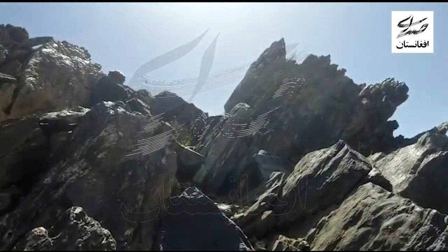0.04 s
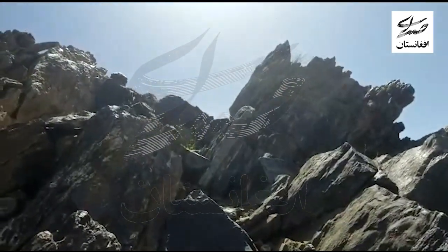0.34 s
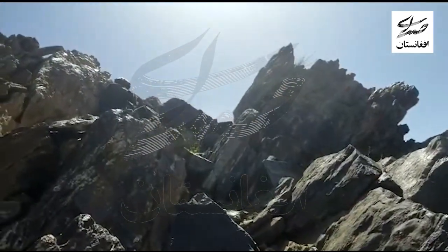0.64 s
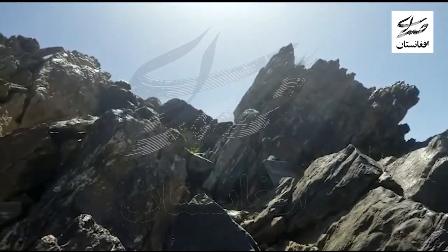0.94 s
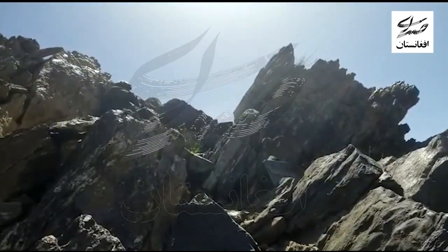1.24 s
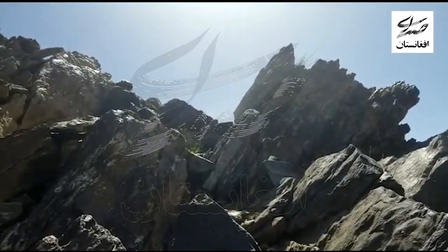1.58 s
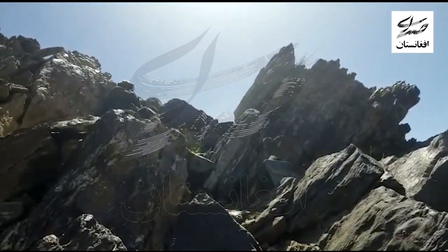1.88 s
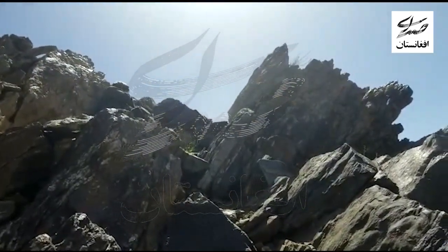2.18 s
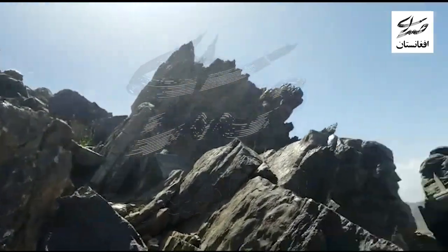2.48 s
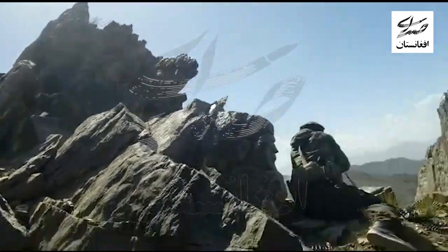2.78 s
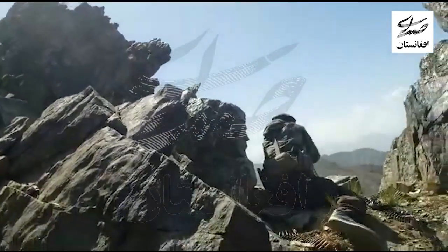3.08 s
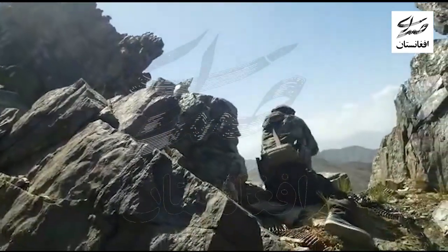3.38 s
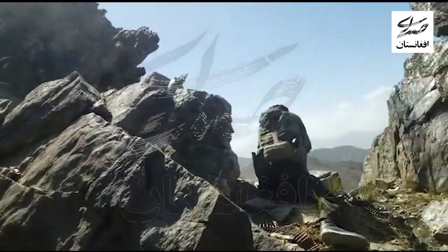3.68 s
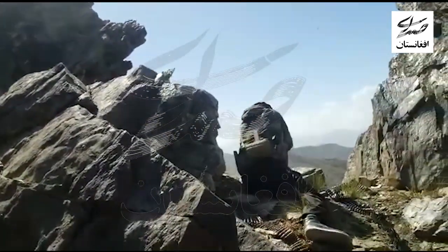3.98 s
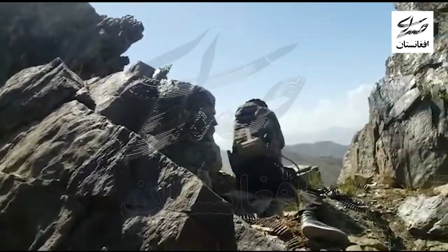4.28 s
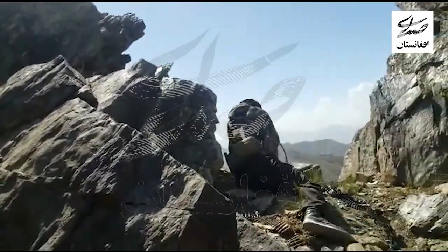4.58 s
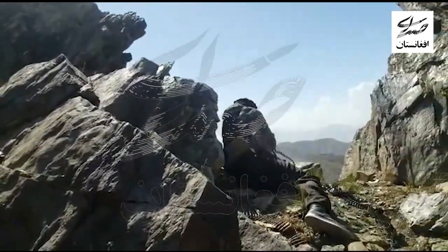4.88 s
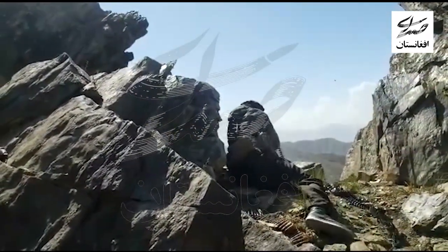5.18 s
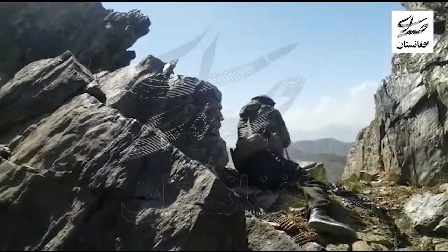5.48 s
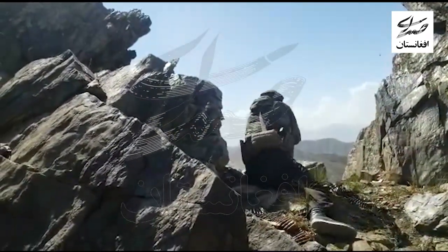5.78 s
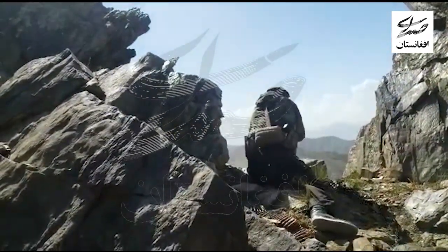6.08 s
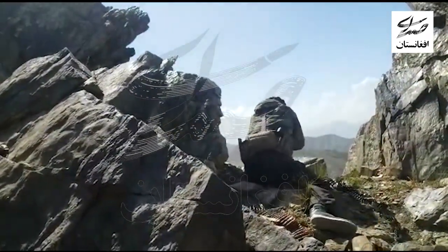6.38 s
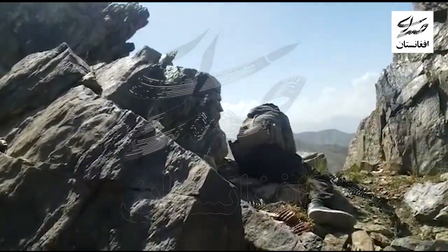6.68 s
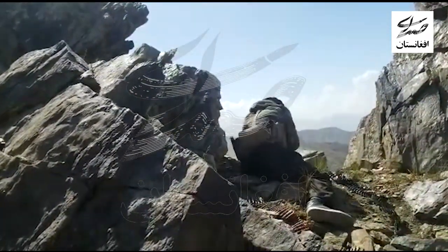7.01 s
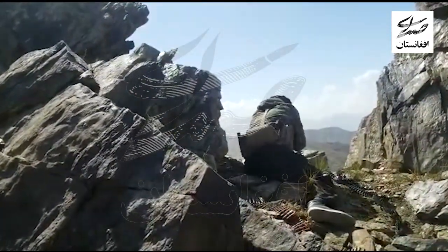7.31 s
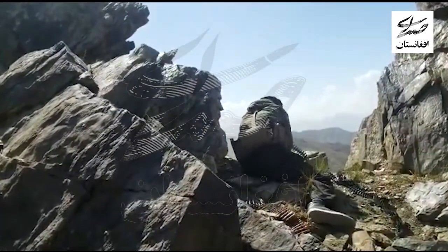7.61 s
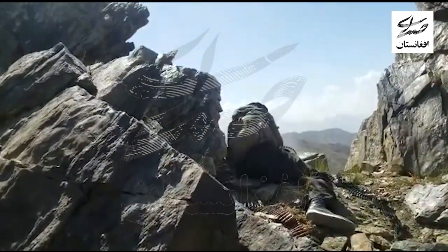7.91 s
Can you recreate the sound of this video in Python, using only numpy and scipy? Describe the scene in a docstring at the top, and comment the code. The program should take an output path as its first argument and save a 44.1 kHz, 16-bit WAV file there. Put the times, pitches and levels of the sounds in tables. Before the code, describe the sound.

Close, loud gunfire outdoors among boulders: a second gun fires once, small metal pieces clink softly, and a machine gun rattles off a brief burst. Two quick single shots follow, then two longer rapid bursts with a few more single shots mixed in. The sharp, thumping reports push the microphone into slight distortion, slap back from the cliffs and fade over the slopes. The gaps are nearly silent.

```python
"""A belt-fed machine gun fires three bursts among boulders on a mountain ridge.
A second gun adds single shots. Each muzzle blast, a pressure jump and its suction, bounces between
the near rocks, scatters off the rubble, slaps back from the cliffs and rolls away down the valley.
The shots overload the microphone; a dull noise bed, a faint rustle and a few clinks lie underneath."""
import sys
import numpy as np
from scipy import signal
from scipy.fft import irfft
from scipy.io import wavfile

SR = 44100
rng = np.random.default_rng(int(sys.argv[2]) if len(sys.argv) > 2 else 0)


def dump(signal):
    """Clip the signal to [-1, 1] and save it as 16-bit WAV at the path in sys.argv[1]."""
    limited = np.clip(np.atleast_2d(signal).T, -1, 1)
    pcm = np.round(limited * 32767).astype(np.int16)
    wavfile.write(sys.argv[1], SR, pcm)


N = 355005
SHORT, LONG = SR // 4, SR  # samples in a hit and in an echo tail


# the machine gun's rounds, in three bursts: t/s, level/dB
ROUNDS = [(1.8406, -0.8), (1.9233, -3), (2.0, -2), (2.082, -3.3), (2.1653, -3), (3.6582, -3.5),
          (3.7387, -1.5), (3.8259, -1.5), (3.913, -1.5), (4.0051, -3.5), (4.0964, -2.2), (4.1861, -2.5),
          (4.2786, -1.5), (4.372, -1), (4.4666, -1.1), (4.5536, -1), (4.6441, -1.5), (4.7468, -0.5),
          (4.8342, -1), (6.6782, 0.2), (6.773, -0.8), (6.8498, -2), (6.9434, -2), (7.037, -0.8),
          (7.1137, -3), (7.1976, -3.5), (7.2854, -2.5), (7.3765, -2.1), (7.464, -3.5), (7.548, -2.5),
          (7.634, -3), (7.7229, -2), (7.8008, -3), (7.8885, -1.8), (7.9682, -3)]
# its straight path to the microphone: delay/s, level/dB, low-pass f/Hz
DIRECT_PATH = (0, -3.6, 3140)
# hollows between the boulders, rung by the blast: f/Hz, t60/s, level/dB, delay/s
HOLLOW_MODES = [(178, .09, -31, .0232), (242, 0.091, -24, .0242), (338.7, .055, -14, .0089),
                (487, 0.089, -20.5, .0001), (685.2, .1, -20.5, .001), (951, .11, -27, .0001),
                (1096, 0.053, -21, .0001), (1233, .06, -30, .0002), (1316, 0.054, -32.5, .0002),
                (1669, 0.1, -27.5, .0002), (2024, .11, -29.5, .0002)]
# the steel of the gun and its belt: f/Hz, t60/s, level/dB
STEEL_MODES = [(2980, .15, -57), (6030, .22, -55.5), (6070, 0.2, -60), (11600, .2, -73)]
def machine_gun(boom_db, scatter_db, crack_db, hollow_db):
    """Each round layers a boom, ringing rock hollows, rubble scatter, a crack and a ping of steel."""
    out, count = np.zeros((2, N)), len(ROUNDS)
    paths = [DIRECT_PATH] + flutter(count=6)
    hollows = np.zeros((1, SHORT))
    for hz, t60, db, delay in HOLLOW_MODES:
        add(hollows, delay, from_db(db) * ring(hz, t60))
    steel = sum(from_db(db) * ring(hz, t60) for hz, t60, db in STEEL_MODES)
    fronts = cracks(count, t60=0.034, rise_s=0.00063, bounce_s=.0024, bounce_db=-3)
    fronts = fronts * from_db(rng.normal(0, 1.0, (count, 1, 1)))
    for (s, db), scatter, crack in zip(ROUNDS, rubble(count, same=0.42), fronts):
        boom = blast(paths, swing_hz=150, damping=1.1, bleed_hz=40, wander_s=.00006, spread_db=.7)
        body = from_db(boom_db) * boom + from_db(hollow_db) * hollows
        bright_db = 0.24 * db  # the top end follows the round's strength only a little
        add(out, s, from_db(db) * body * pan(left_db=1.1))
        add(out, s, from_db(bright_db + scatter_db) * scatter * pan(left_db=.7))
        add(out, s, from_db(bright_db + crack_db) * crack * pan(left_db=-.4))
        add(out, s, steel * from_db(rng.normal(0, 3, (2, 1))))
    return out


def blast(paths, swing_hz, damping, bleed_hz, wander_s, spread_db):
    """A pressure jump and its suction arrive along every path, varying by shot and by side."""
    jf = 1j * np.fft.rfftfreq(SHORT, 1 / SR)
    u = jf / swing_hz
    swing = SR / (2 * np.pi * swing_hz) * u / (u * u + damping * u + 1)
    pulse = swing * jf / (jf + bleed_hz)  # the sub-bass bleeds off
    arrivals = 0
    for delay, db, dull_hz in paths:
        late = np.maximum(delay + wander_s * rng.standard_normal((2, 1)), 0)
        gain = from_db(db + spread_db * rng.standard_normal((2, 1)))
        arrivals = arrivals + gain * np.exp(-2 * np.pi * jf * late) / (1 + jf / dull_hz)
    return irfft(pulse * arrivals, SHORT)


# gaps between boulders: first arrival t/s, round trip/s, level/dB, leak/dB, low-pass f/Hz
BOULDER_GAPS = [(.00332, .00596, 7.6, .94, 100), (.00809, .0124, -4.5, 3.6, 530)]
def flutter(count):
    """The blast shuttles across each gap; askew faces make the leak grow with the trips squared."""
    return [(first_s + k * trip_s, db - leak_db * k * k, dull_hz)
            for first_s, trip_s, db, leak_db, dull_hz in BOULDER_GAPS for k in range(count)]


# tone of the shock front: f/Hz, level/dB
CRACK_EQ = [(700, -11), (1500, 6), (3000, 0.5), (5800, 1.5), (8300, -17.5), (12500, -1), (16000, -9)]
def cracks(count, t60, rise_s, bounce_s, bounce_db):
    """The attack of each shot: a torn, bright shock front and its bounce off the ground."""
    t = np.arange(SHORT // 4) / SR
    front = (1 - np.exp(-t / rise_s)) * decay(t, t60)
    bounce = from_db(bounce_db) * np.exp(-((t - bounce_s) / 0.001) ** 2)
    return noise(CRACK_EQ, size=len(t), count=count) * (front + bounce)


# tone of the scatter off the rubble: f/Hz, level/dB
RUBBLE_EQ = [(100, -18), (300, -1.5), (600, 0), (1100, -3), (1600, -5), (2500, -10), (4000, -13.5),
             (5800, -10.5), (7000, -31), (8500, -29.5), (12500, -15.5), (16000, -26.5)]
# its decay: f/Hz, t60/s
RUBBLE_DECAY = [(150, 0.23), (600, 0.12), (2000, 0.095), (6000, .095), (12000, .085)]
def rubble(count, same):
    """Dense scatter: partly the same for every shot from one spot, partly stirred by the moving muzzle."""
    draws = noise(RUBBLE_EQ, size=SHORT, t60=RUBBLE_DECAY, count=count + 1)
    build_up = 1 - np.exp(-np.arange(SHORT) / SR / 0.0041)
    return (np.sqrt(same) * draws[0] + np.sqrt(1 - same) * draws[1:]) * build_up


# extra low thumps under some late rounds: t/s, level/dB
LOW_THUMPS = [(2.1643, -15.5), (4.7468, -20.5), (4.8347, -12.5), (7.7233, -10.5), (7.9685, -17.5)]
def low_thumps(opening_db, fade_db_per_s, steady_db, spread_db, pause_s):
    """A deep thump with each round, unequal left and right, strongest as a burst opens."""
    out, times = np.zeros((2, N)), np.array(ROUNDS)[:, 0]
    opens_burst = np.diff(times, prepend=0) > pause_s
    burst_start = np.maximum.accumulate(times * opens_burst)
    floor_db = steady_db + spread_db * rng.standard_normal(len(times))
    thump_db = np.maximum(opening_db - fade_db_per_s * (times - burst_start), floor_db)
    for s, db in [*zip(times, thump_db), *LOW_THUMPS]:
        add(out, s, from_db(db) * thump(hz=57.5, t60=0.039, uneven=1.3))
    return out


def thump(hz, t60, uneven):
    """A short, deep thump; a detuned side signal makes left and right unequal."""
    side = uneven * rng.choice([-1, 1]) * np.array([[1], [-1]])
    return ring(hz, t60) + side * ring(hz * rng.uniform(.6, 1.1), t60)


# the second gun's shots: t/s, blast level/dB, crack level/dB, thump level/dB
SINGLE_SHOTS = [(0.071, 6, 2.5, 2.5), (2.6818, -1.1, -2.5, -2), (2.777, -2.5, -2.4, -13.5),
                (3.9478, -0.6, -3.4, 0.4), (4.6289, 0, 1.8, -13.5), (7.4266, -4.5, -2.6, -44)]
# its paths, straight and off the rocks: delay/s, level/dB, low-pass f/Hz
SINGLE_PATHS = [(0.0, -16.9, 6000), (0.00332, -5.8, 390), (0.00493, -11.9, 910), (0.00636, 2.5, 290),
                (0.01008, -11.6, 740), (0.01613, -18.6, 900), (0.01801, -1.1, 120)]
def single_shots(boom_db, scatter_db, crack_db, thump_db, bark_db, slap_db, slap_s):
    """The second gun: a deeper blast with a hard bark, and a rough cliff throws its crack back."""
    out, count = np.zeros((2, N)), len(SINGLE_SHOTS)
    fronts = cracks(count, t60=0.019, rise_s=.0004, bounce_s=0.00083, bounce_db=-7)
    slap = noise(CRACK_EQ, size=SHORT // 8)[0] * np.hanning(SHORT // 8) ** 2
    for (s, db, bright_db, low_db), scatter, crack in zip(SINGLE_SHOTS, rubble(count, same=.4), fronts):
        boom = blast(SINGLE_PATHS, swing_hz=126, damping=2.2, bleed_hz=40, wander_s=.0002, spread_db=2)
        bark = np.array([ring(hz, t60=.014) for hz in 780 * rng.uniform(.85, 1.15, 2)])
        body = from_db(boom_db) * boom + from_db(db + bark_db) * bark  # harder blasts bark more
        add(out, s, from_db(db) * body)
        add(out, s, from_db(bright_db + scatter_db) * scatter)
        add(out, s, from_db(bright_db + crack_db) * crack)
        add(out, s, from_db(low_db + thump_db) * thump(hz=62.2, t60=0.044, uneven=1.4))
        add(out, s + slap_s, from_db(bright_db + slap_db) * slap)
    return out


# tone of the roll over the slopes: f/Hz, level/dB
ROLL_EQ = [(30, -10), (60, -1), (170, 2.5), (400, -5.5), (900, -20), (1300, -24), (1900, -18.5),
           (2600, -18), (4000, -25), (6000, -21.5), (8500, -38), (12500, -31), (16000, -44.5)]
# its decay: f/Hz, t60/s
ROLL_DECAY = [(60, .65), (200, 0.46), (800, 0.47), (2500, .42), (6000, 0.4), (12000, .26)]
# slapbacks from the cliffs: delay/s, level/dB
CLIFF_SLAPS = [(0.088, 1), (0.159, 0.5), (.275, -2.5)]
# tone of the tail from far down the valley: f/Hz, level/dB
VALLEY_EQ = [(50, -6), (200, -2.5), (700, -6.5), (1400, -10), (2600, -13), (4000, -26), (6000, -27),
             (8500, -36.5), (12000, -33), (16000, -43.5)]
def slopes(roll_db, single_db, early_db, valley_db, valley_t60):
    """Every shot rolls over the slopes: thin at first, full once the cliffs answer, then far away."""
    out, t = np.zeros((2, N)), np.arange(LONG) / SR
    shots = list(ROUNDS) + [(s, db + single_db) for s, db, *_ in SINGLE_SHOTS]
    answered = .5 + .5 * np.tanh((t - CLIFF_SLAPS[0][0] + 0.0092) / .006)
    swell = from_db(early_db) * (1 - np.exp(-t / .02)) + answered
    for delay, db in CLIFF_SLAPS:
        swell = swell + from_db(db) * np.exp(-((t - delay) / .011) ** 2)
    roll = noise(ROLL_EQ, size=LONG, t60=ROLL_DECAY, count=5) * swell
    valley = noise(VALLEY_EQ, size=LONG, count=5) * answered * decay(t, valley_t60)
    shared, *variants = roll + from_db(valley_db) * valley
    for k, (s, db) in enumerate(shots):
        stirred = variants[k % len(variants)]  # moving air changes part of the echo from shot to shot
        add(out, s, from_db(db + roll_db) * (shared + stirred) / np.sqrt(2))
    return out


# clinks before the first burst: t/s, level/dB, centre f/Hz
CLINKS = [(0.7157, -62.5, 1850), (0.8982, -65, 1780), (0.966, -71, 1650), (1.056, -60.5, 1870),
          (1.0937, -56, 11100), (1.3162, -67, 6150), (1.3676, -66, 11600), (1.4544, -67.5, 5110)]
# the ring of the metal: f/Hz, t60/s, level/dB
CLINK_MODES = [(700, .03, 2.5), (1880, 0.024, -1), (2800, .03, -6), (4970, .035, -6), (5800, .02, -9),
               (11130, .015, -4)]
def clinks(ring_db, tick_db, tick_t60):
    """Small metal things touch the stones: a dry tick, and a short ring of the modes near its pitch."""
    out, t = np.zeros((2, N)), np.arange(SHORT) / SR
    for s, db, centre_hz in CLINKS:
        edges_hz = [centre_hz * 0.65, min(centre_hz * 2.4, SR * .4)]
        band = signal.butter(1, edges_hz, "band", fs=SR, output="sos")
        tick = signal.sosfilt(band, rng.standard_normal((2, SHORT)) * decay(t, tick_t60))
        add(out, s, from_db(db + tick_db) * tick / np.abs(tick).max())
        for hz, t60, mode_db in CLINK_MODES:
            near = np.exp(-(np.log(hz / centre_hz) / 1.5) ** 2)
            add(out, s, from_db(db + ring_db + mode_db) * near * ring(hz * rng.uniform(0.97, 1.06), t60))
    return out


# tone of the dry rustle: f/Hz, level/dB
RUSTLE_EQ = [(1000, -1), (1700, 2), (2800, 0), (3800, -7), (5500, -5), (8000, -17.5), (11500, -7),
             (14000, -11), (16000, -18)]
# soft scrapes near the microphone: t/s, length/s, level/dB
SCUFFS = [(.86, .14, -80), (1.083, .1, -70), (1.295, .1, -76)]
# their brighter hiss: f/Hz, level/dB
SCUFF_EQ = [(2000, -30), (4000, -8), (5500, -1), (8300, -11), (11300, 0), (14500, -3), (16000, -12)]
def rustle(hiss_db, grain_db):
    """A faint, grainy rustle near the microphone, with a few brighter scuffs that swell and sink."""
    t = np.arange(SHORT) / SR
    _, ride_db = bed_levels()
    out = from_db(hiss_db + ride_db) * noise(RUSTLE_EQ, size=N)[0]
    for (s, length, db), scuff in zip(SCUFFS, noise(SCUFF_EQ, size=SHORT, count=len(SCUFFS))):
        add(out, s, from_db(db) * np.sin(np.pi * np.minimum(t / length, 1)) * scuff)
    knots = np.arange(0, N, SR // 150)  # a new random level 150 times a second
    grains = np.interp(np.arange(N), knots, rng.standard_normal(len(knots)))
    return from_db(grain_db * grains) * out


# tone of the background noise: f/Hz, level/dB
AMBIENCE_EQ = [(18, -44.5), (30, -22), (53, -4.5), (205, -4.5), (1730, -23), (2250, -24), (2840, -38),
               (6200, -48.5), (9150, -56.5), (12200, -42), (15000, -62.5)]
def ambience(level_db, edge_hz):
    """Dull background noise whose level dips after the shots and creeps back up."""
    lowpass = signal.butter(10, edge_hz, fs=SR, output="sos")
    ride_db, _ = bed_levels()
    return from_db(level_db + ride_db) * signal.sosfilt(lowpass, noise(AMBIENCE_EQ, size=N)[0])


# the bed before the first shot: t/s, ambience level/dB, rustle level/dB
BED_OPENING = [(.05, -62, -82)]
# the bed in the pauses, one list each: t/s, ambience level/dB, rustle level/dB
BED_PAUSES = [
    [(0.6, -72, -90), (0.952, -71.5, -84), (1.498, -70, -88), (1.74, -65.5, -81)],
    [(3.2, -71, -96), (3.44, -72.5, -99), (3.56, -68.5, -87)],
    [(5.3, -69, -98.5), (5.584, -69.5, -98), (6.254, -64.5, -102), (6.63, -57.5, -100)],
]
def bed_levels():
    """Fader rides for the ambience and the rustle, in dB."""
    s, *levels = np.concatenate([BED_OPENING, *BED_PAUSES]).T
    return [np.interp(np.arange(N) / SR, s, db) for db in levels]


# stereo image of the noise layers: f/Hz, left-right correlation
STEREO_IMAGE = [(60, .7), (200, .88), (600, 0.2), (1200, 0), (2200, 0), (12000, 0.02)]
def noise(spectrum, size, t60=None, count=1):
    """Draws of stereo noise in half-octave bands, starting at rms 1; t60 gives each band a decay."""
    edges = 25 * 2 ** np.arange(0, 9.6, .5)
    white = rng.standard_normal((2, 2, count, size + SR // 10))
    out, power = 0, 0
    for k, (low, high) in enumerate(zip(edges, edges[1:])):
        band = signal.butter(2, [low, high], "band", fs=SR, output="sos")
        mid, side = signal.sosfilt(band, white[k % 2])[..., -size:]
        hz = np.sqrt(low * high)
        alike, gain = at_hz(STEREO_IMAGE, hz), from_db(at_hz(spectrum, hz))
        mid, side = np.sqrt(1 + alike) * mid, np.sqrt(1 - alike) * side
        fade = 1 if t60 is None else decay(np.arange(size) / SR, at_hz(t60, hz))
        out = out + gain * fade * np.stack([mid + side, mid - side], axis=1)
        power += gain ** 2 * (high - low) * 2 / (SR / 2)
    return out / np.sqrt(power)


def ring(hz, t60):
    """A damped sine."""
    t = np.arange(SHORT) / SR
    return np.sin(2 * np.pi * hz * t) * decay(t, t60)


def decay(t, t60):
    """An envelope that falls 60 dB in t60 seconds."""
    return np.exp(-np.log(1000) * t / t60)


def from_db(db):
    """Decibels to gain."""
    return 10 ** (np.asarray(db) / 20)


def pan(left_db):
    """Lift the left side and lower the right by as much."""
    return from_db([[left_db], [-left_db]])


def at_hz(points, hz):
    """Read a table on a log-frequency axis."""
    freqs, values = np.array(points).T
    return np.interp(np.log(hz), np.log(freqs), values)


def add(track, s, sound):
    """Mix a sound in at s seconds."""
    start = max(round(s * SR), 0)
    part = track[:, start:start + sound.shape[-1]]
    part += sound[..., :part.shape[-1]]


def port(x, hz, q, db):
    """A peak or dip in the response of the microphone's port."""
    return x + (from_db(db) - 1) * signal.lfilter(*signal.iirpeak(hz, q, fs=SR), x)


def scene():
    """Both guns up front, their echoes behind, and the quiet bed."""
    guns = machine_gun(boom_db=2.5, scatter_db=-11.5, crack_db=-17, hollow_db=1.5)
    guns += low_thumps(opening_db=-9, fade_db_per_s=119, steady_db=-32, spread_db=2.5, pause_s=.3)
    guns += single_shots(boom_db=3.5, scatter_db=-15.0, crack_db=-14.5, thump_db=-17, bark_db=-15,
                         slap_db=-40.5, slap_s=.072)
    roll = slopes(roll_db=-32, single_db=-1.5, early_db=-3.5, valley_db=-19.5, valley_t60=1.1)
    foley = clinks(ring_db=-2.5, tick_db=6.5, tick_t60=0.038) + rustle(hiss_db=4.5, grain_db=3.0)
    backdrop = roll + ambience(level_db=1.5, edge_hz=2600)
    return guns + backdrop * pan(left_db=1.1) + foley


def record(dry):
    """The microphone sheds deep bass, rounds the peaks and colours each side's treble; the top is cut."""
    ceiling, cutoff_hz = 1.05, 15900
    thin = signal.sosfilt(signal.butter(2, 37, "high", fs=SR, output="sos"), dry)
    rounded = ceiling * np.tanh(thin / ceiling)
    dipped = port(rounded, hz=8450, q=2.9, db=-4.5)
    left, right = port(dipped, hz=12500, q=3.6, db=3.5)
    coloured = np.array([port(left, hz=4140, q=2.4, db=-2.0), port(right, hz=4260, q=2.2, db=1.72)])
    return signal.sosfilt(signal.ellip(12, .1, 80, cutoff_hz, fs=SR, output="sos"), coloured)


dry = scene()
out = record(dry)
dump(out)
```